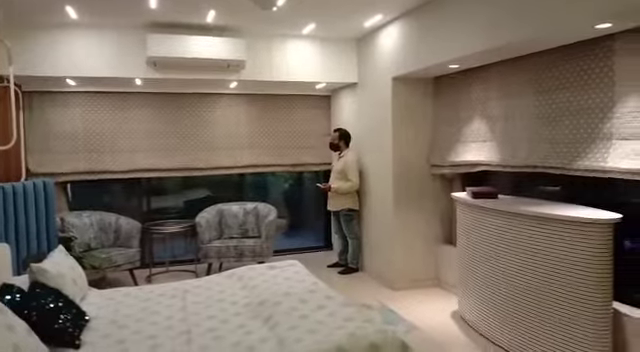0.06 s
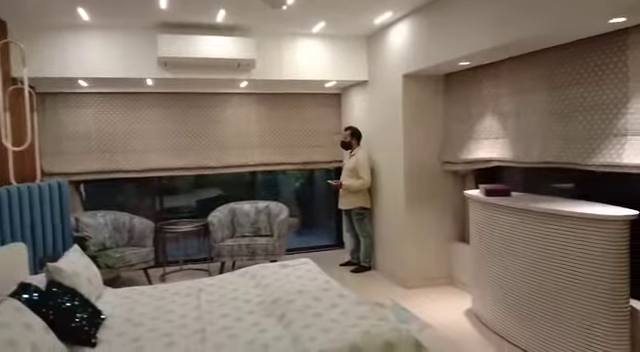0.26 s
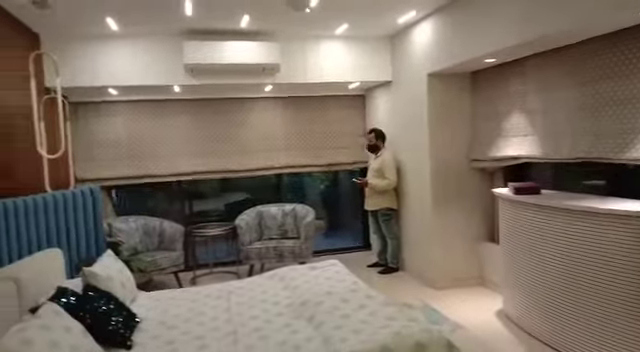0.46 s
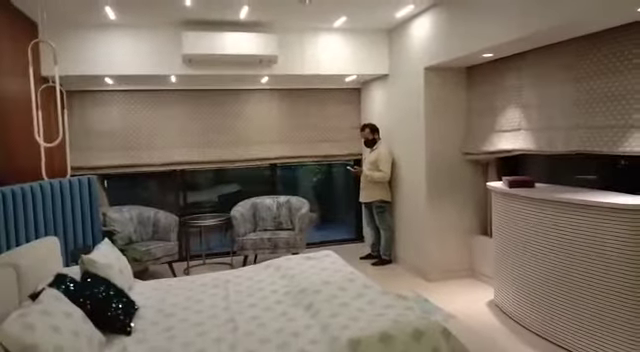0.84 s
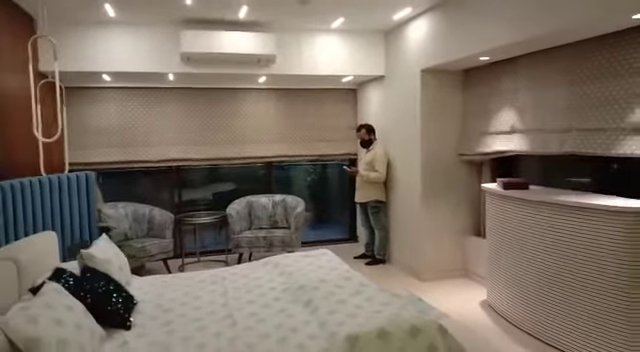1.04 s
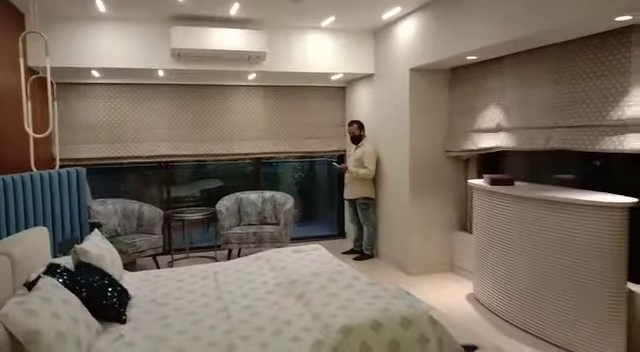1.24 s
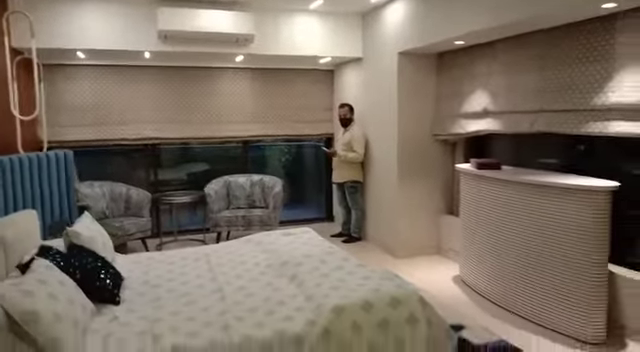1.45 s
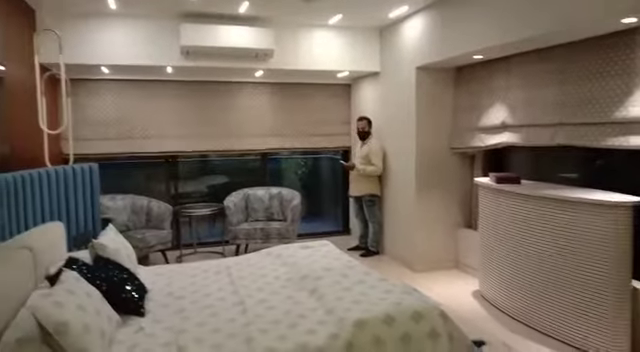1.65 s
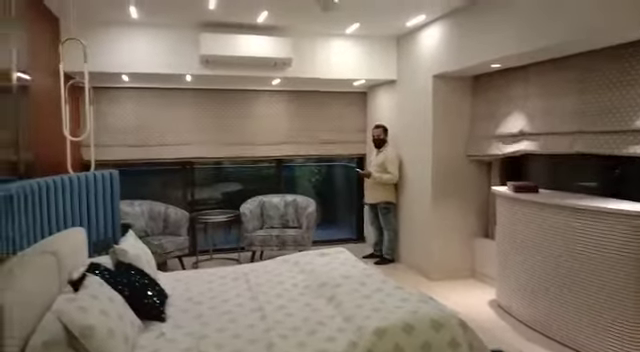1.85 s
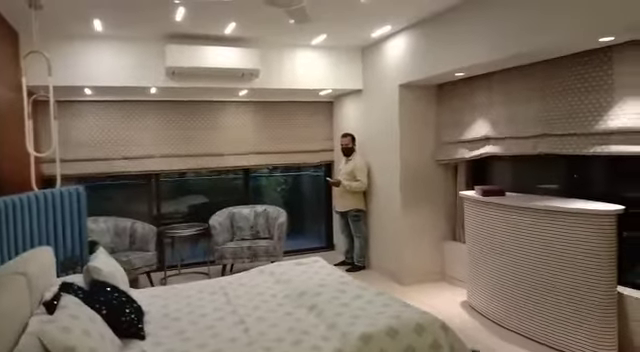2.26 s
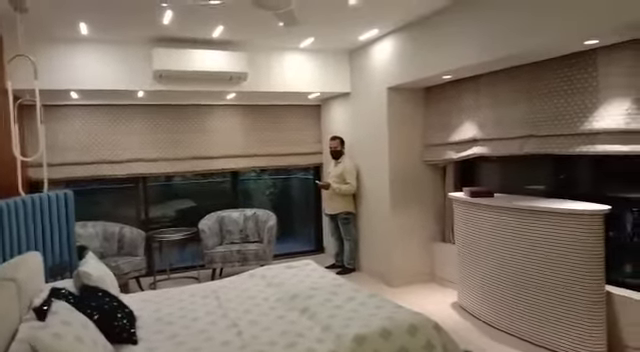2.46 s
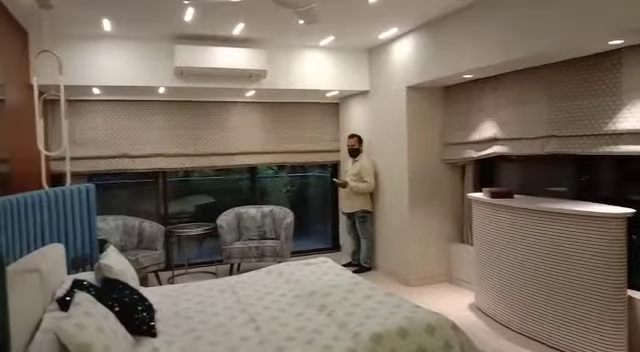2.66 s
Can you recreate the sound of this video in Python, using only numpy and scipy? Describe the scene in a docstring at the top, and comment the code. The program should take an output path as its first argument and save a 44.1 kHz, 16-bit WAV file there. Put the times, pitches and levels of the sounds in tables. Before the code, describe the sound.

Motorised blinds whir faintly in a quiet bedroom, with rustling, one click and soft bumps.

```python
"""Motorised blinds in a quiet bedroom

Two blinds rise with a low motor hum and a thin, rough gear whine. Close to the microphone,
clothes rustle and rub as their fibres catch, and a small hard part clicks once and rings.
Soft low bumps are scattered throughout and bunch into a short, louder run with dull scuffing.
The walls add a short tail over steady room tone; the stereo image is nearly mono."""
import sys
import numpy as np
from scipy import signal
from scipy.fft import rfft, irfft, next_fast_len
from scipy.io import wavfile
from scipy.ndimage import map_coordinates

SR = 44100
rng = np.random.default_rng(int(sys.argv[2]) if len(sys.argv) > 2 else 0)


def bounce(signal):
    """Save signal as a 16-bit WAV file at the path given by the first command-line argument."""
    frames = np.transpose(np.atleast_2d(signal))
    limited = np.clip(frames, -1, 1)
    pcm = np.round(limited * 32767).astype(np.int16)
    wavfile.write(sys.argv[1], SR, pcm)


N = 123479
T = np.arange(N) / SR
FREQS = np.maximum(np.fft.rfftfreq(N, 1 / SR), 1)

# gear tones of the blinds (pitch [Hz], glide [Hz/s], base level [dB], level slope [dB/s])
GEAR_TONES = [(1275, -8, -63.5, -2.5), (1226, -8, -68.5, 1.3), (789, -3, -81.5, 2), (1009, -5, -78, 0.5),
              (1958, -8, -91.5, 3)]
# rise and fall of the whole whine (time [s], gain [dB])
WHINE_GAIN = [(0, -0.5), (.7, 2.5), (.82, 1.5), (.85, 5.5), (.9, 0.5), (1.05, 5.5), (1.1, -4), (1.38, 1.5),
              (1.44, -17), (1.5, -5), (1.73, -1.5), (1.765, -4.5), (1.81, -1), (1.96, 3), (2.02, -1),
              (2.1, 1.5), (2.33, 4.5), (2.44, -1.5), (2.55, 2.5), (2.8, -3.5)]
# cloth sliding on cloth (frequency [Hz], relative level [dB])
CLOTH_SPECTRUM = [(200, -18), (700, -14), (1100, -9.5), (1700, 1), (2400, 2.5), (3100, -4), (3450, -1.5),
                  (4050, -2.5), (4500, -4.5), (5200, -3.5), (6000, 0.5), (6600, -11), (7400, -4.5),
                  (8300, -21), (9600, -17), (10700, -35), (14000, -30.5), (15200, -24)]
# strokes of cloth (start [s], length [s], attack [s], level [dB], tilt [dB/octave], fold level [dB])
CLOTH_STROKES = [(0.094, 0.19, 0.072, -62.5, 5, -80), (0.173, 0.061, 0.0032, -55, -0.5, -61.5),
                 (0.246, 0.19, 0.023, -56, -4, -69), (0.572, 0.098, 0.011, -60.5, 3, -65),
                 (0.684, 0.14, 0.066, -60, -2, -65), (0.806, 0.12, 0.026, -68, 3.5, -66),
                 (0.916, 0.16, 0.028, -60, -4, -61.5), (1.078, 0.13, 0.077, -60, -3, -60.5),
                 (1.244, 0.073, .025, -67, -0.5, -69), (1.678, 0.24, 0.036, -70, 1.5, -67),
                 (1.924, .22, 0.021, -71, -2, -75)]
# hollow resonances of the folds (centre [Hz], width [Hz], relative level [dB])
FOLD_RESONANCES = [(397, 150, -3.5), (598, 90, -5)]
# narrow swishes of rubbing (start [s], length [s], attack [s], centre [Hz], width [Hz], level [dB])
RUB_SWISHES = [(-.03, 0.28, 0.032, 1547, 89, -56.5), (-.03, 0.27, .02, 1810, 290, -63),
               (0.085, 0.23, 0.042, 4360, 240, -67), (0.169, 0.17, 0.011, 1404, 400, -52),
               (0.158, 0.11, 0.027, 7530, 900, -64.5), (0.572, .04, .008, 5910, 250, -71),
               (0.61, 0.029, .03, 8900, 1110, -71.5), (0.657, 0.034, .025, 1540, 353, -64),
               (0.7, 0.21, 0.012, 587, 61.4, -67), (0.76, 0.083, .03, 2820, 650, -66.5),
               (0.967, 0.046, 0.046, 930, 160, -62), (1.17, 0.063, .03, 2700, 706, -67),
               (1.70, 0.19, 0.078, 5500, 550, -74.5), (2.024, 0.1, 0.026, 960, 70, -62),
               (2.072, 0.032, .02, 3130, 450, -70), (2.505, 0.042, 0.022, 1432, 49.5, -67)]
# contacts within the one click (time [s], level [dB])
CLICK_CONTACTS = [(.3191, -32.5), (.31955, -26), (.32045, -38.5)]
# modes of the hard part (frequency [Hz], relative level [dB], T60 [s])
PART_MODES = [(496, -24.5, 0.054), (690, -12, 0.02), (853, -21, 0.073), (1260, -15.5, 0.28),
              (1760, -18, 0.036), (1900, -3, .03), (2240, 1.5, 0.01), (2560, -5, 0.01), (3370, -10, 0.045),
              (4770, -6.5, 0.015), (5300, -4, 0.0054), (7540, -18, 0.025), (8800, -19, 0.0031)]
# the click as furniture and walls return it (frequency [Hz], relative level [dB])
ECHO_SPECTRUM = [(100, -31), (200, -12), (300, -18), (480, -1.5), (750, -7), (1080, -7.5), (1270, 11),
                 (1500, -7), (2200, 2), (3000, -3), (3400, -5.5), (4100, -10), (4800, -6.5), (6100, -10),
                 (6600, -19), (7500, -11.5), (8200, -22.5), (9500, -25), (11000, -42), (14000, -37),
                 (15200, -29)]
# dull bumps (time [s], level [dB], pitch [Hz])
SOFT_BLOWS = [(.197, -42, 96), (0.282, -51, 105), (0.654, -52, 98), (1.134, -48, 145), (1.421, -51.5, 96),
              (1.874, -49, 93.5), (2.212, -38, 138), (2.2342, -26, 120), (2.262, -36.5, 144),
              (2.281, -28.5, 110.3), (2.322, -28.5, 118), (2.35, -34, 130), (2.381, -41.5, 168),
              (2.403, -34, 103), (2.446, -32.5, 111), (2.496, -39, 106), (2.536, -44, 108),
              (2.584, -45.5, 84), (2.624, -48.5, 77.6)]
# scuffing under the run of bumps (frequency [Hz], relative level [dB])
SCUFF_SPECTRUM = [(25, -16), (50, -17), (80, 1), (140, -2), (225, 0.5), (280, -7), (350, -8.5),
                  (500, -16.5), (620, -30.5), (1000, -69)]
# the still bedroom (frequency [Hz], relative level [dB])
ROOM_SPECTRUM = [(25, -12), (50, -14), (75, -0.5), (140, -5), (200, -5), (300, -12.5), (520, -11.5),
                 (650, -19), (800, -15), (1080, -16), (1550, -17.5), (2300, -22), (4200, -27.5),
                 (5800, -28.5), (6600, -36), (7400, -33.5), (8500, -40.5), (13800, -41.5), (15200, -32)]
# microphone hiss that differs between left and right (frequency [Hz], relative level [dB])
HISS_SPECTRUM = [(30, 11), (120, 4), (500, 10.5), (6000, 5.5), (9000, -8.5), (13800, -0.5), (15200, -5)]


def motor_hum(hz=99.6, db=-63, waver=0.0184, flutter_db=5.5):
    """The blind motors hum on one low tone that wavers in pitch and flutters in level."""
    phase = 2 * np.pi * np.cumsum(hz * (1 + waver * walk(12))) / SR
    return undb(db) * unit(np.sin(phase) * undb(flutter_db * walk(14.7)))


def gear_whine(waver=0.017, swell_db=2, rattle_depth=0.6):
    """Rattling gear tones waver, swell unevenly and sag slowly as the blinds rise."""
    whine = np.zeros(N)
    for hz, glide, db, slope in GEAR_TONES:
        pitch = (hz + glide * T) * (1 + waver * walk(45.2))
        mesh_phase = 2 * np.pi * np.cumsum(pitch) / SR
        load = undb(swell_db * walk(24))
        rattle = 1 + rattle_depth * walk(100)
        whine += undb(db + slope * T) * unit(load * rattle * np.cos(mesh_phase))
    return whine * undb(np.interp(T, *np.array(WHINE_GAIN).T))


def clothes(grain=0.26):
    """Close by, each stroke is a dense grain of catching fibres over softer folds; rubs add swishes."""
    rustle = np.zeros(N)
    fibres = shifting_cloth(noise() * np.exp(grain * walk(630)))
    push = noise()
    folds = drifting(sum(undb(db) * band(push, hz, width) for hz, width, db in FOLD_RESONANCES))
    for start, length, attack, db, tilt, fold_db in CLOTH_STROKES:
        stroke = undb(db) * colour(fibres, CLOTH_SPECTRUM, tilt) + undb(fold_db) * folds
        rustle += swell(start, length, attack) * np.roll(stroke, rng.integers(N))
    for start, length, attack, hz, width, db in RUB_SWISHES:
        rustle += swell(start, length, attack) * undb(db) * drifting(band(noise(), hz, width))
    return in_room(rustle, wet_db=-3)


def shifting_cloth(x, bands=26, depth_db=4, rate_hz=12):
    """Neighbouring resonances swell and fade on their own as the cloth changes shape."""
    spectrum = rfft(x)
    place = np.interp(np.log(FREQS), np.log([600, 11000]), [0, bands - 1])
    patches = (irfft(spectrum * np.maximum(1 - abs(place - k), 0), N) for k in range(bands))
    return sum(patch * undb(depth_db * walk(rate_hz)) for patch in patches)


def drifting(x, share=0.014, rate_hz=7):
    """The rubbed resonances in x wander in pitch together."""
    return map_coordinates(x, [np.cumsum(1 + share * walk(rate_hz))], mode="mirror")


def click():
    """Quick contacts ring a hard part too small to give bass; near surfaces, then the walls answer."""
    ring = np.zeros(N)
    for start, db in CLICK_CONTACTS:
        for hz, mode_db, t60 in PART_MODES:
            ring += undb(db + mode_db) * decay(start, t60) * np.sin(2 * np.pi * hz * (T - start))
    radiated = signal.butter(4, [390, 10200], "band", fs=SR, output="sos")
    onset = CLICK_CONTACTS[0][0]
    early = undb(-31) * decay(onset, t60=0.038)
    late = undb(-37.5) * decay(onset, t60=0.36)
    low_room = undb(-57.5) * swell(onset, length=0.055, attack=0.028) * band(noise(), 259, width_hz=130)
    return signal.sosfilt(radiated, ring) + (early + late) * colour(noise(), ECHO_SPECTRUM) + low_room


def bumps(rise_s=0.0052, t60=0.12):
    """Soft blows, each a few low cycles dying away."""
    thuds = np.zeros(N)
    for start, db, hz in SOFT_BLOWS:
        age = np.maximum(T - start, 0)
        rise = np.sin(np.pi / 2 * np.minimum(age / rise_s, 1)) ** 2
        thuds -= undb(db) * rise * fade(start + rise_s, t60) * np.sin(2 * np.pi * hz * age)
    return in_room(thuds, wet_db=-13.5)


def scuffing(start=2.21, rise_s=0.016, hold_s=0.061, t60=0.68, db=-43):
    """A dull scuff of low noise goes with the loud run of bumps."""
    rise = np.clip((T - start) / rise_s, 0, 1)
    return undb(db) * rise * fade(start + hold_s, t60) * colour(noise(), SCUFF_SPECTRUM)


def walls(x, t60=0.95):
    """The bedroom's short diffuse tail, at about the power of x."""
    tail = noise() * decay(0, t60)
    return signal.fftconvolve(x, tail / np.linalg.norm(tail))[:N]


def in_room(x, wet_db):
    """Direct sound and wall tail meet at the microphone, keeping the overall power."""
    return (x + undb(wet_db) * walls(x)) / np.hypot(1, undb(wet_db))


def room_tone(db=-64.5):
    """The bedroom's steady background, strongest in the bass."""
    return undb(db) * colour(noise(), ROOM_SPECTRUM)


def undb(db):
    """Decibels to gain."""
    return 10 ** (np.asarray(db) / 20)


def unit(x):
    """Scale to rms 1."""
    return x / np.sqrt(np.mean(x ** 2))


def noise():
    """White noise."""
    return rng.standard_normal(N)


def colour(x, points, tilt_db=0):
    """Shape x by (frequency [Hz], level [dB]) points, tilted per octave; rms 1."""
    hz, db = np.array(points).T
    octave = np.log2(FREQS)
    gain = undb(np.interp(octave, np.log2(hz), db) + tilt_db * octave)
    return unit(irfft(rfft(x) * gain, N))


def band(x, hz, width_hz):
    """A resonance with steep skirts; rms 1."""
    size = next_fast_len(N)
    freqs = np.maximum(np.fft.rfftfreq(size, 1 / SR), 1)
    detune = (freqs ** 2 - hz ** 2) / (freqs * width_hz)
    return unit(irfft(rfft(x, size) / (1 + detune ** 2 / 4) ** 2, size)[:N])


def walk(rate_hz):
    """Smooth random wander of rms 1, changing about rate_hz times a second."""
    size = next_fast_len(N)
    hz = np.fft.rfftfreq(size, 1 / SR)
    return unit(irfft(rfft(noise(), size) * np.exp(-(hz / rate_hz) ** 2), size)[:N])


def fade(start, t60):
    """Full level until start, then falling 60 dB in t60 seconds."""
    return np.exp(-np.log(1000) * np.maximum(T - start, 0) / t60)


def decay(start, t60):
    """Silent until start, then falling 60 dB in t60 seconds."""
    return (T >= start) * fade(start, t60)


def swell(start, length, attack, release=0.031):
    """Attack, hold and release of one movement, in seconds."""
    return np.clip((T - start) / attack, 0, 1) * np.exp(-np.maximum(T - start - length, 0) / release)


def low_cut(x, hz):
    """Second-order high-pass."""
    return signal.sosfilt(signal.butter(2, hz, "high", fs=SR, output="sos"), x)


def scene():
    """Every source sits in the centre; a trace of wall tail and microphone hiss gives width."""
    mid = motor_hum() + gear_whine() + room_tone() + clothes() + click() + bumps() + scuffing()
    wall_spread = undb(-35.5) * walls(low_cut(mid, hz=360))
    hiss = undb(-80) * colour(noise(), HISS_SPECTRUM)
    side = wall_spread + hiss
    return np.array([mid + side, mid - side])


def record(dry):
    """The phone's microphone thins the deepest bass, and the top is cut steeply."""
    low_hz, top_hz = 59.5, 15500
    top_cut = signal.ellip(10, 0.2, 70, top_hz, fs=SR, output="sos")
    return signal.sosfilt(top_cut, low_cut(dry, low_hz))


dry = scene()
out = record(dry)
bounce(out)
```